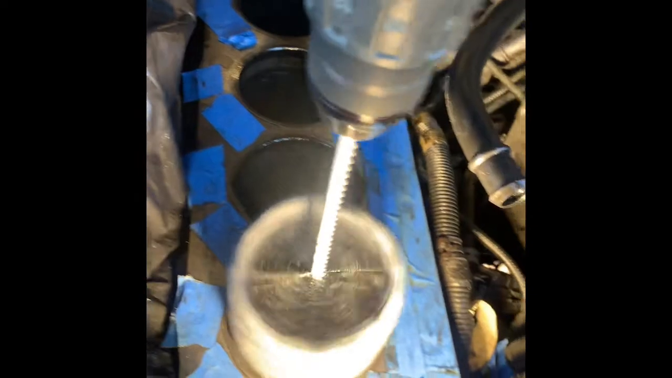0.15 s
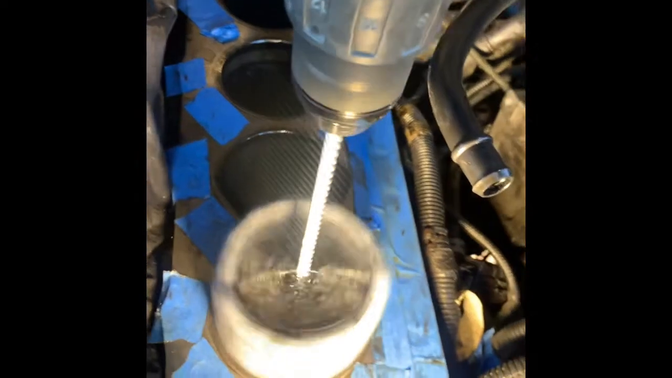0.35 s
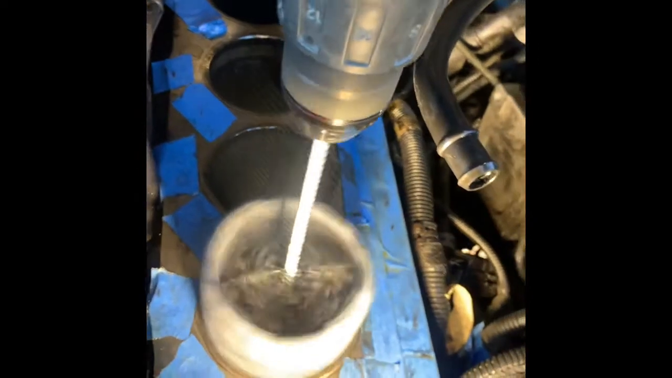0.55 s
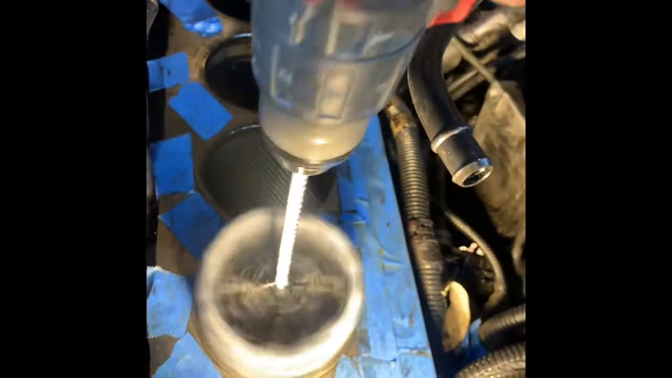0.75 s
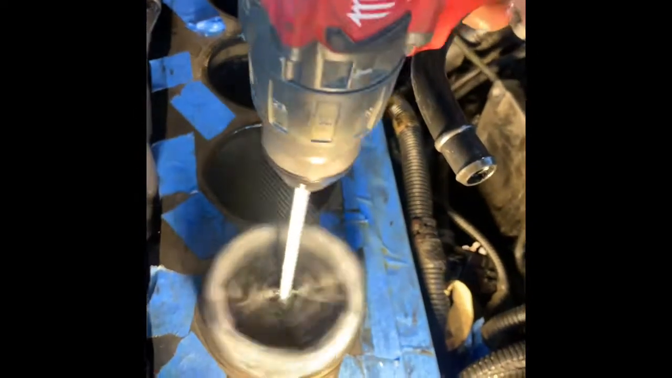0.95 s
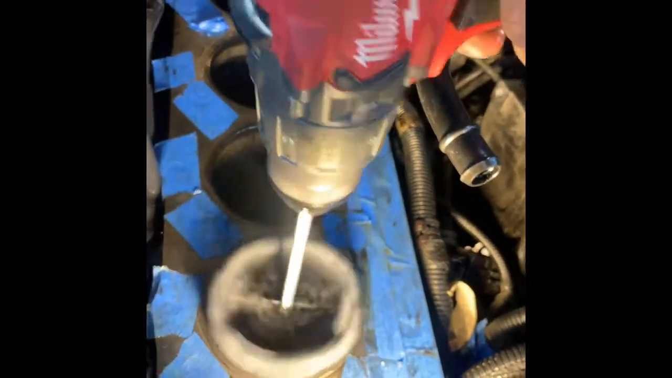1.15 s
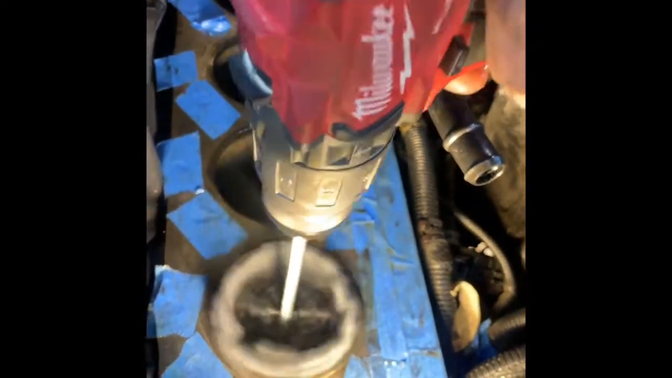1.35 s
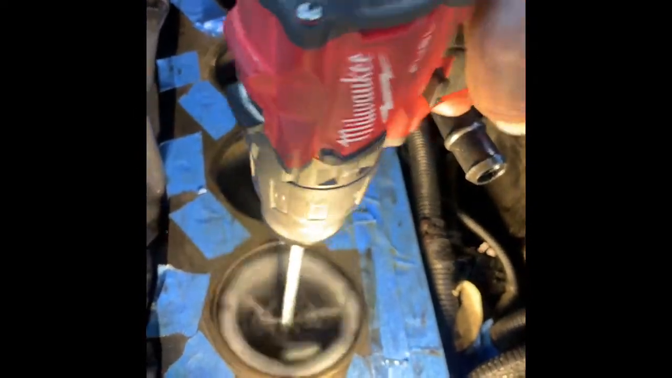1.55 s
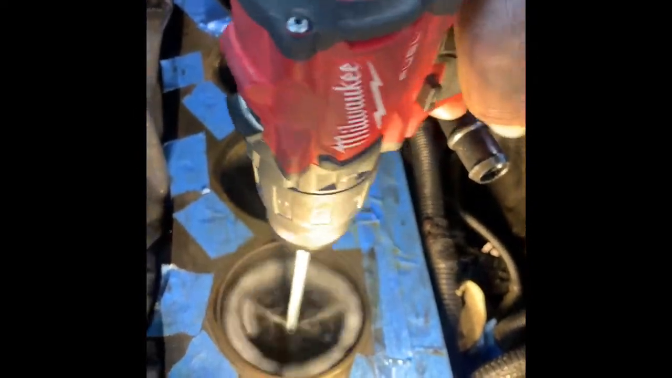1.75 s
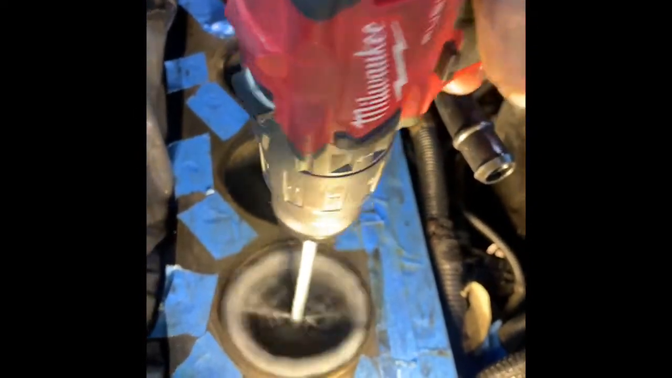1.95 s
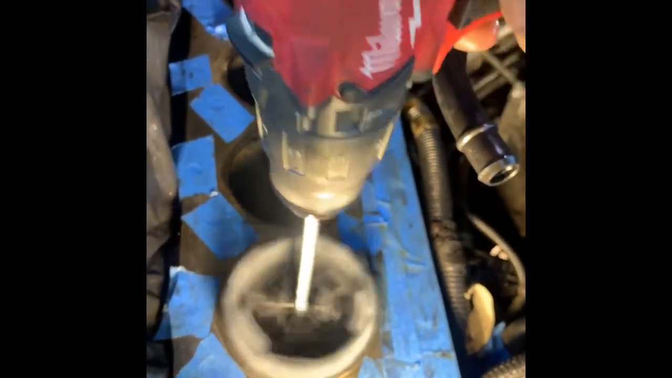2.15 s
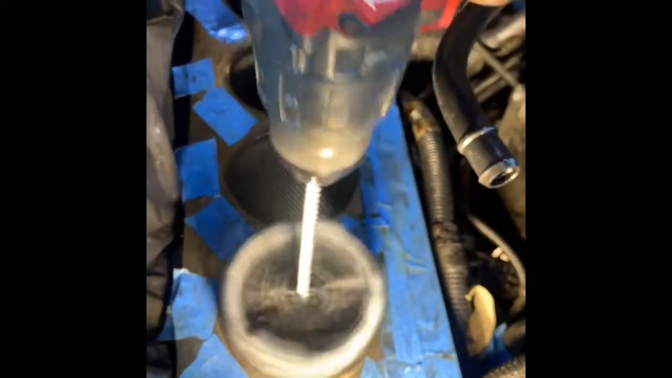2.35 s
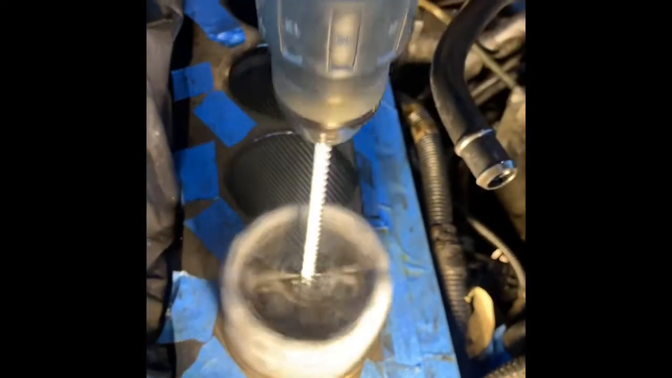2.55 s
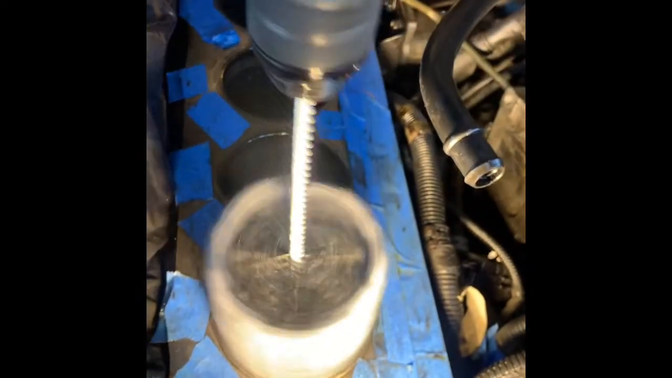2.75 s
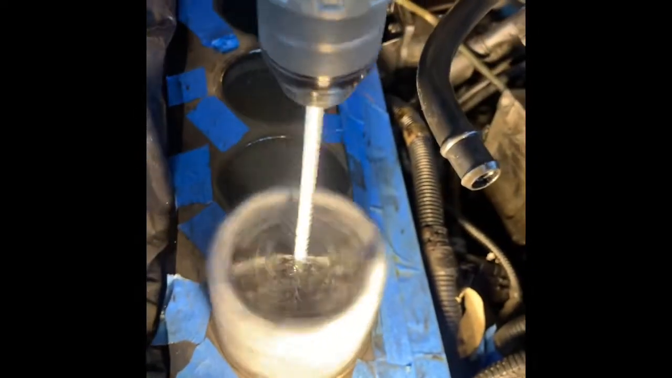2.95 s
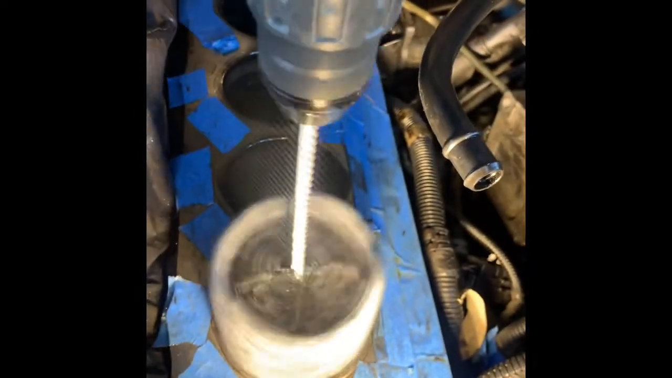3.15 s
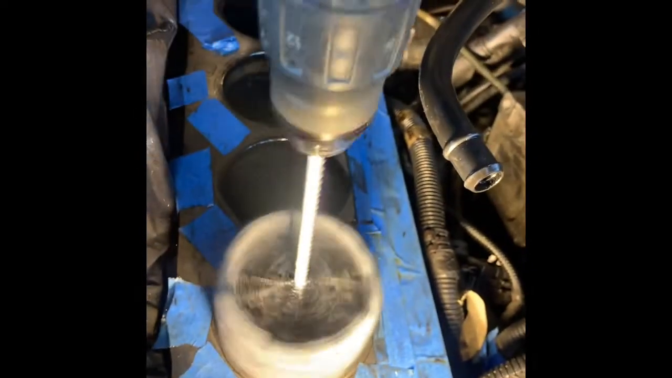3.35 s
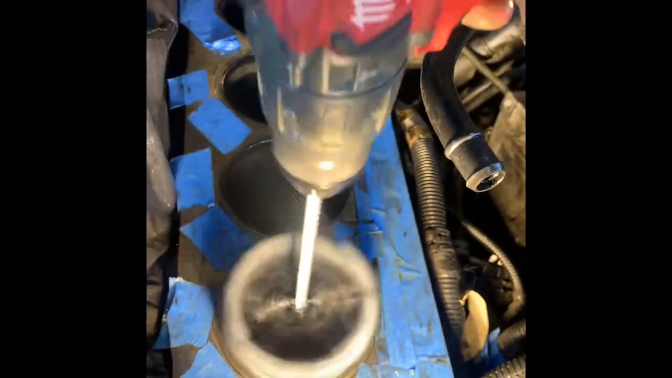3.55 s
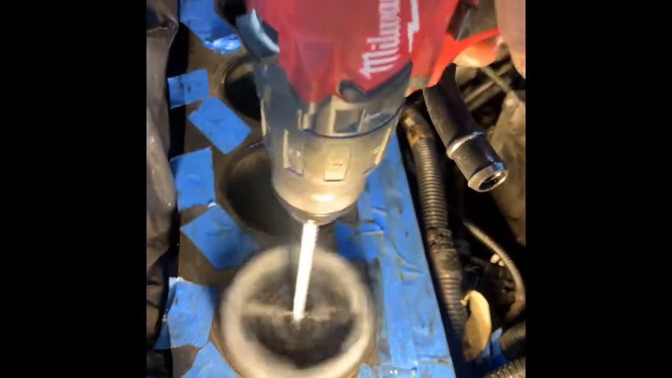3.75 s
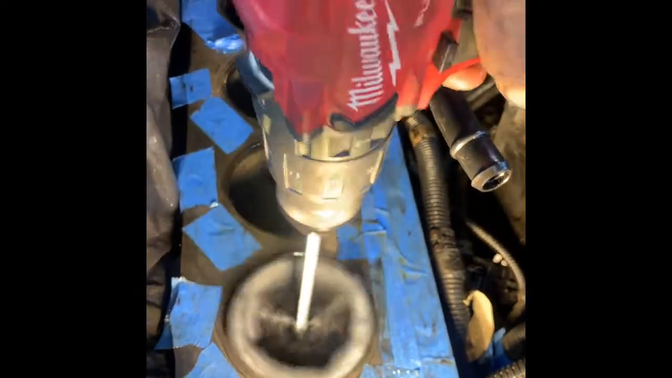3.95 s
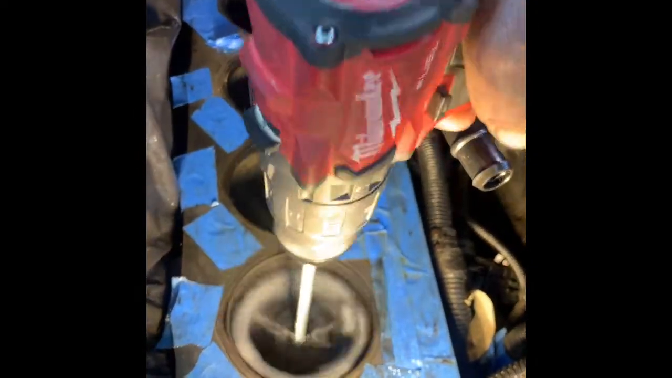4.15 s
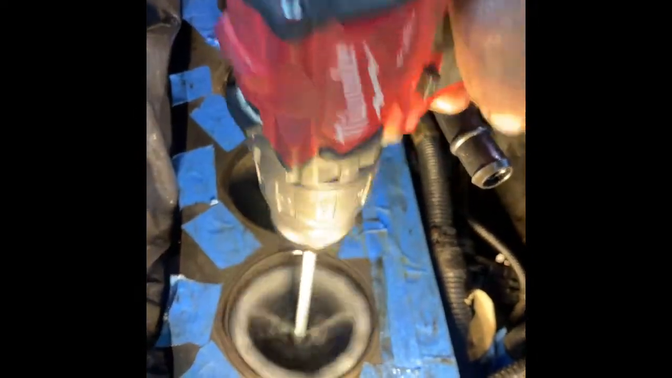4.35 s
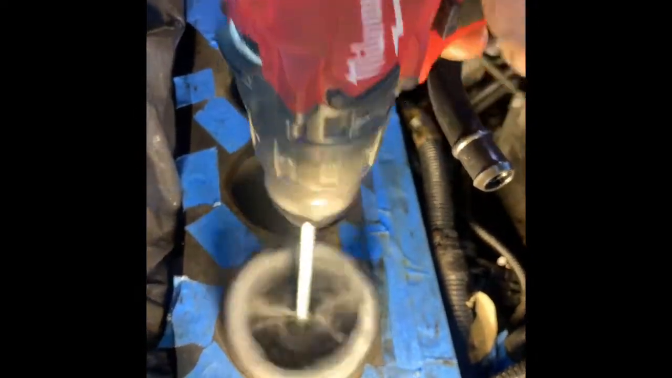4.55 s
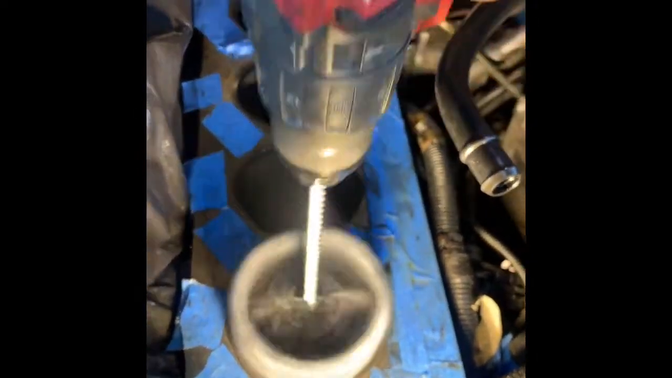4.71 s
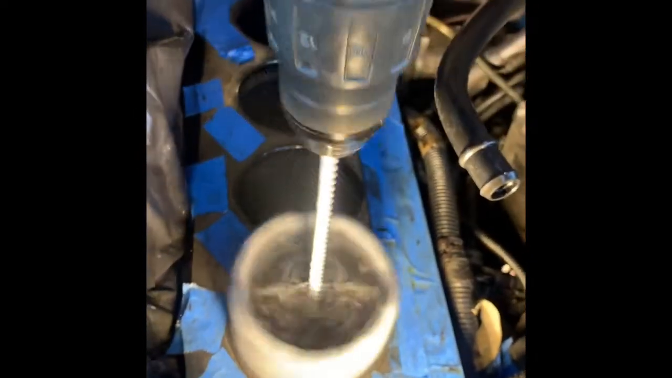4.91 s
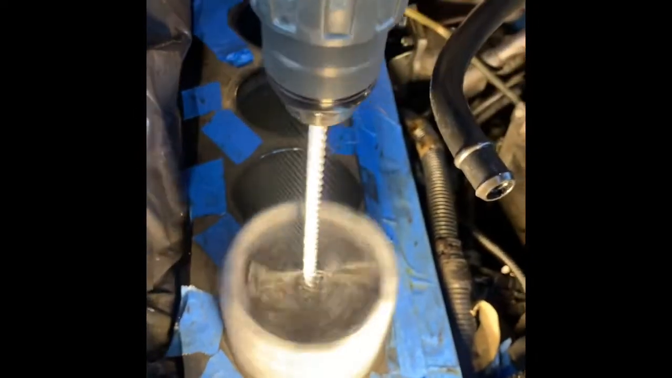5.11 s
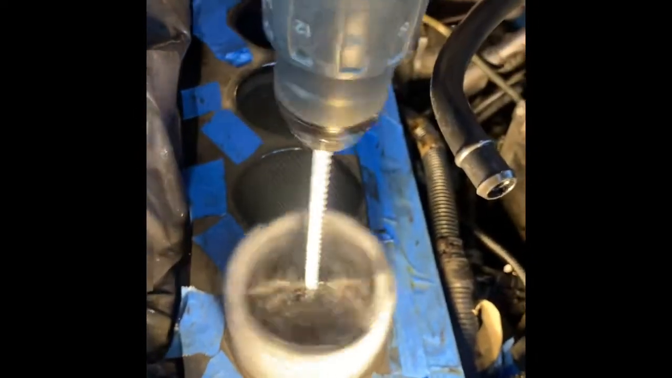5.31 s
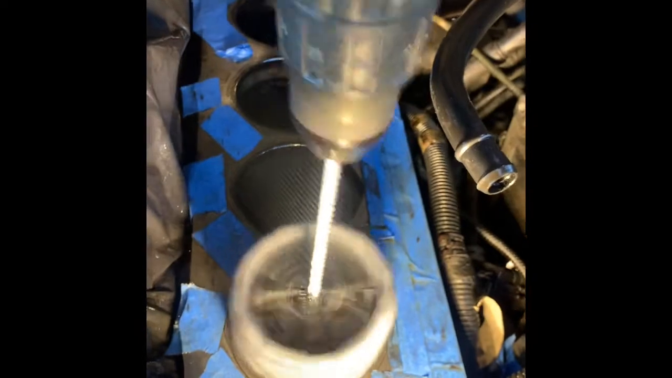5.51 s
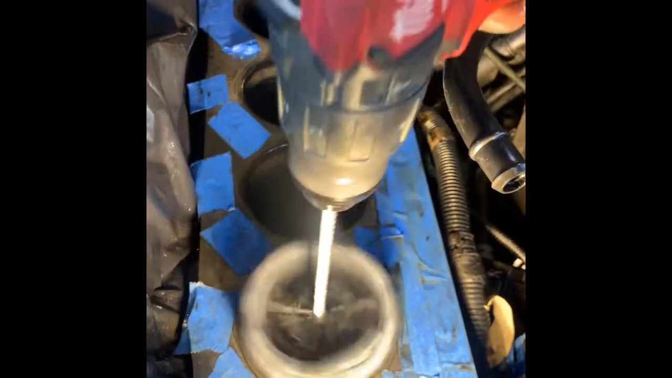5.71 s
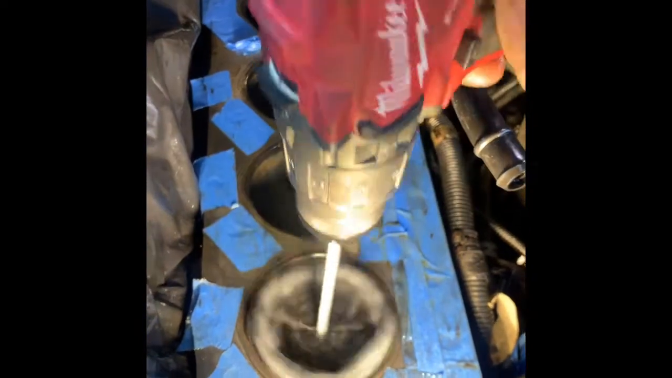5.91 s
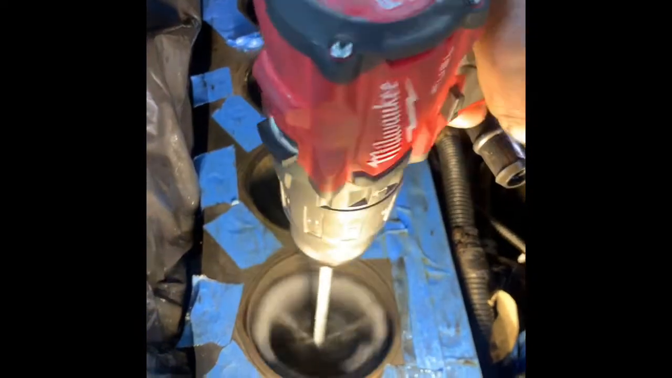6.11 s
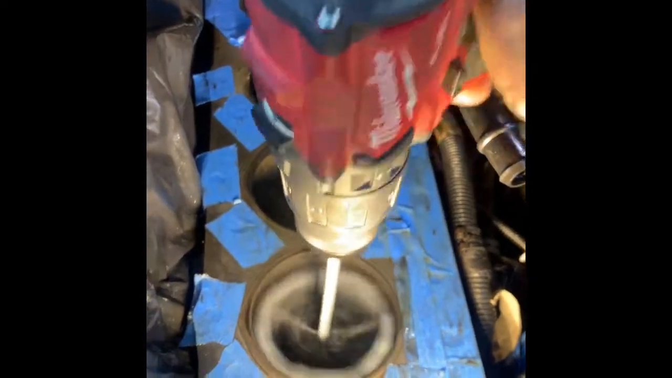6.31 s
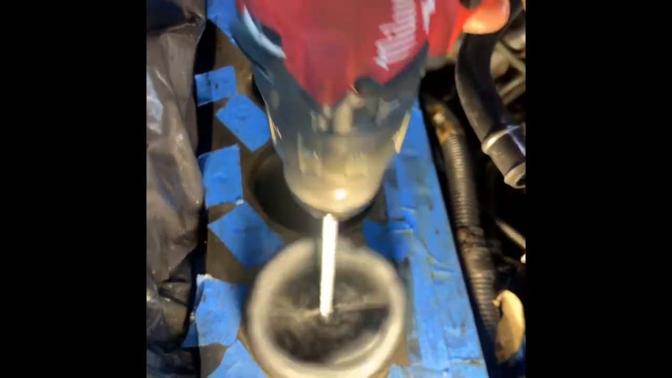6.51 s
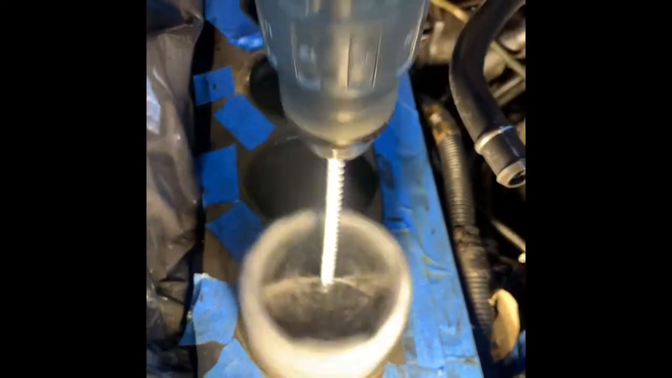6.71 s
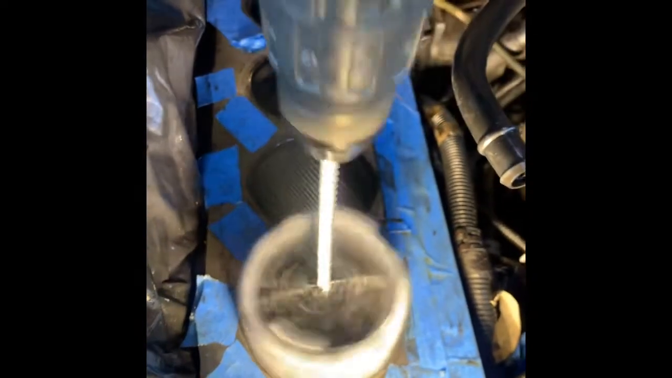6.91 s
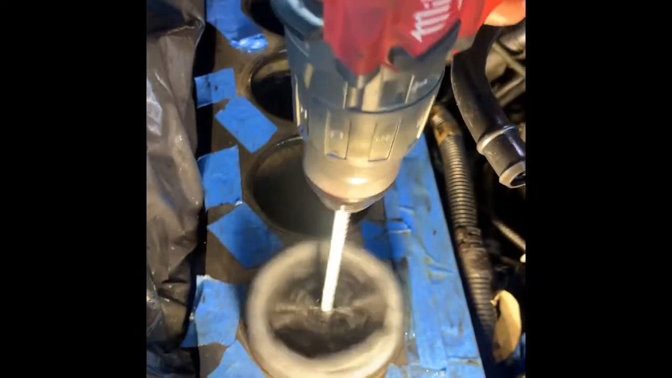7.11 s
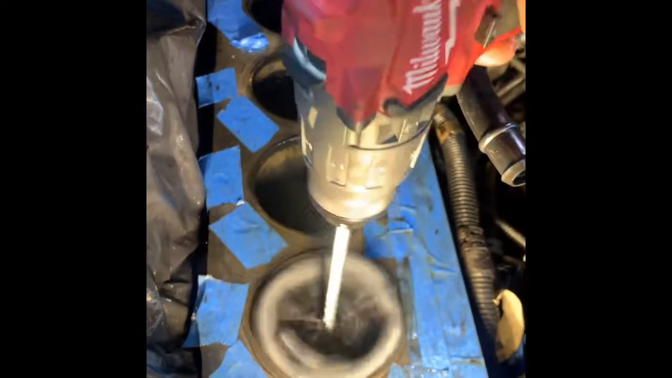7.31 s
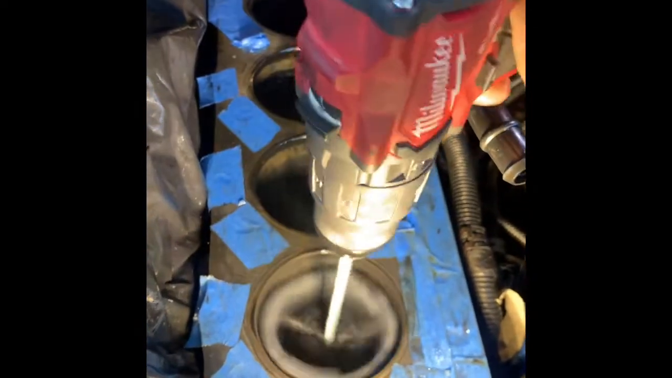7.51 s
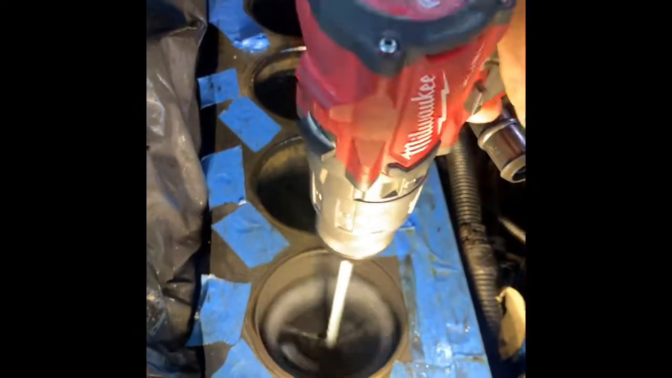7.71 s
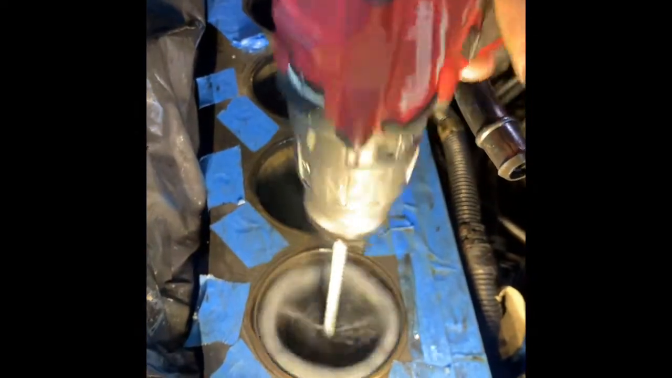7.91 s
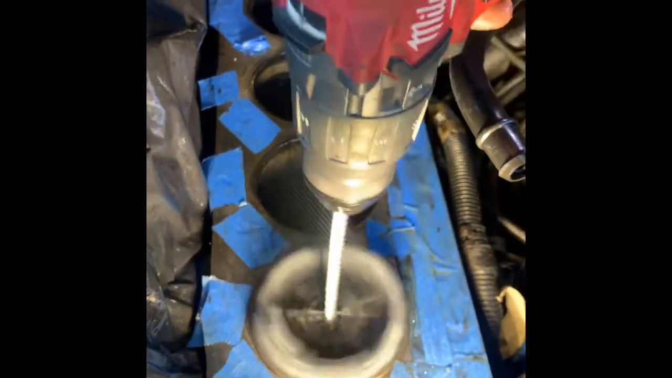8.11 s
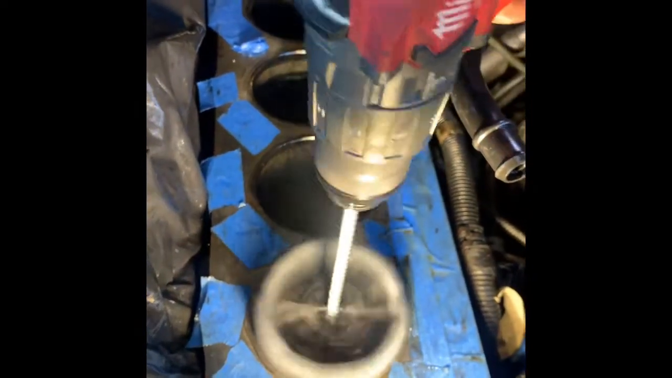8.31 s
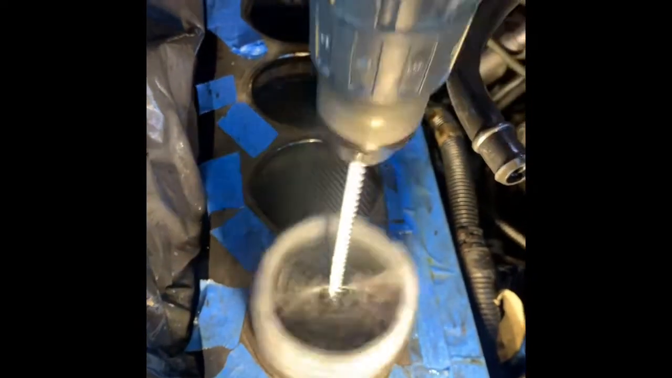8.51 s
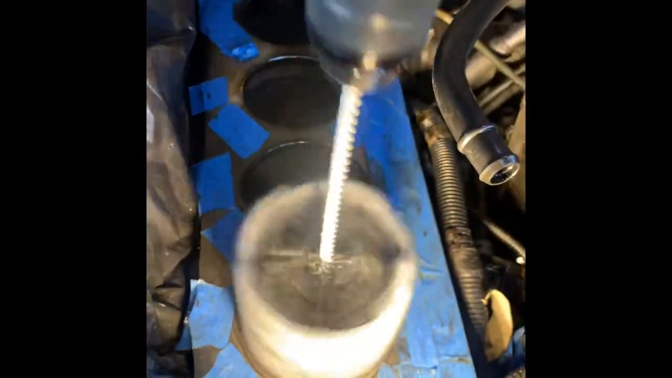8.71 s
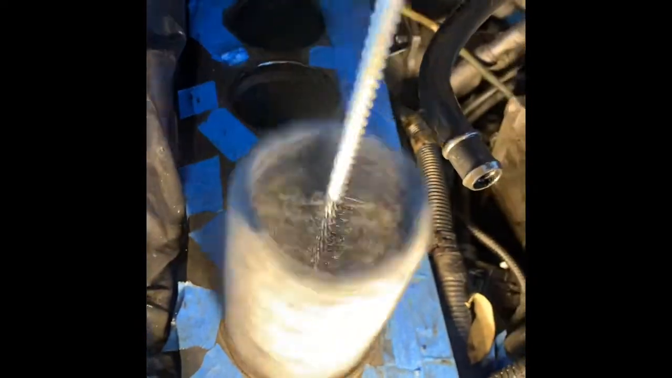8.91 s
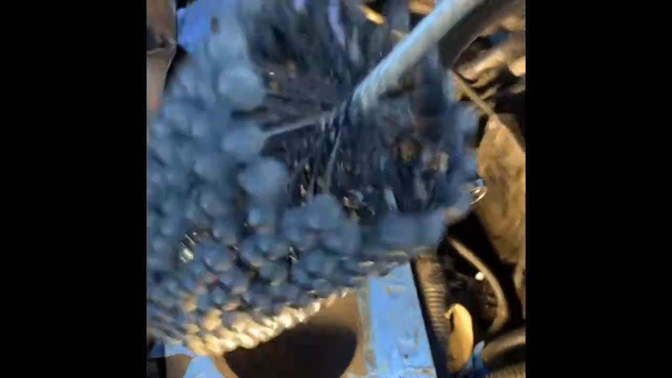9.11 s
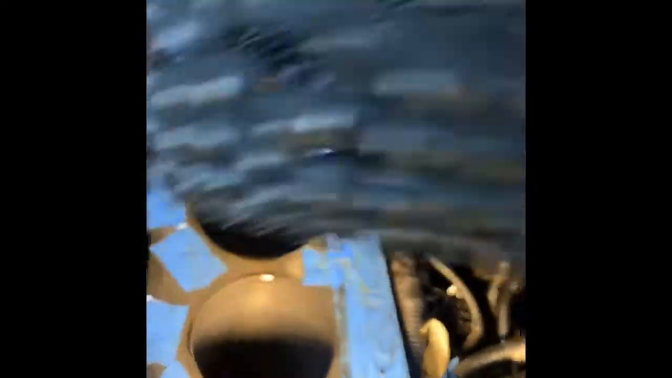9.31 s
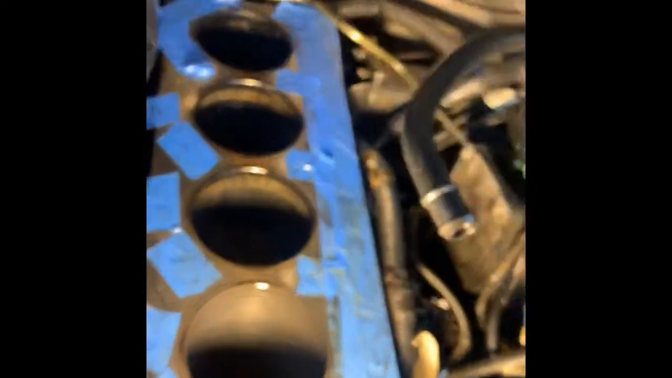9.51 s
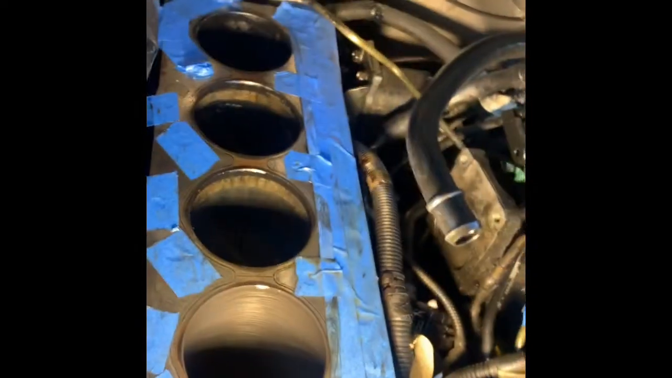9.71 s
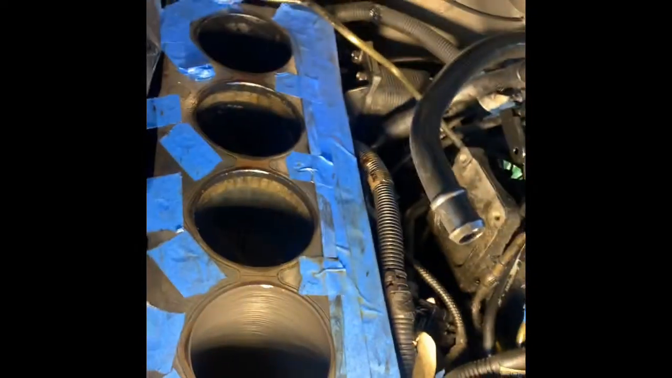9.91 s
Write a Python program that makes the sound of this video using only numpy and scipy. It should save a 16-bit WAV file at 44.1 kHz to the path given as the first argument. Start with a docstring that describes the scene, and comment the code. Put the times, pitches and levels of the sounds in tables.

```python
"""In a workshop, close by: a cordless drill strokes a ball hone up and down an engine cylinder.
Gears, motor and fan whine on the rotor's turning; random grains of grit excite the bore and gearbox.
Shaped noise gives air on the microphone's two ports, the room's quiet and its reflections.
Near 2.55 s the trigger is squeezed harder; the whine then swells in mid-stroke and drops when the load
slackens. Near 9 s the brake stops the chuck with ringing clacks and the hone's wires brush on the way out."""
import sys
import numpy as np
from scipy import signal
from scipy.fft import rfft, irfft
from scipy.io import wavfile

SR = 44100
rng = np.random.default_rng(int(sys.argv[2]) if len(sys.argv) > 2 else 0)


def master_out(mix):
    """Clip the mix to full scale and print it as 16-bit PCM to the path in sys.argv[1]."""
    frames = np.transpose(np.atleast_2d(mix))
    ceiling = np.clip(frames, -1, 1)
    pcm = np.round(ceiling * 32767).astype(np.int16)
    wavfile.write(sys.argv[1], SR, pcm)


N = 439236
TIME = np.arange(N) / SR
FREQ = np.maximum(np.arange(N // 2 + 1) * SR / N, 1)

# quiet of the workshop: pitch_hz, relative_level_db
FLOOR_SPECTRUM = [(15, -24.5), (45, 7), (100, 2.5), (200, -18), (400, -9.5), (700, -26.5), (1500, -19.5),
                  (1950, -14.5), (2400, -35), (3200, -21.5), (4000, -41), (15000, -58)]
# rumble of air on the microphone: pitch_hz, relative_level_db
RUMBLE_SPECTRUM = [(20, -42), (40, -11.5), (60, 2), (88, -0.5), (130, -9.5), (200, -21), (320, -26.5),
                   (600, -48.5), (2000, -81)]
# puffs of air hitting the microphone: centre_s, peak_level_db, half_length_s
GUSTS = [(.1, -56, .1), (.55, -62, .08), (2.39, -44.5, .055), (2.516, -35, 0.036), (2.628, -31.5, 0.042),
         (4.84, -44.5, .06), (4.983, -39, 0.044), (5.09, -43, .035), (5.26, -49, .03), (5.38, -49, .025),
         (5.718, -49, .06), (6.677, -37, 0.036), (6.79, -23, 0.038), (6.88, -37, 0.033),
         (7.622, -49.5, .03), (8.128, -40, .035), (8.297, -43, 0.13), (8.65, -39.5, .03),
         (8.742, -37, 0.056), (9.399, -53, 0.04), (9.902, -57, .05)]
# the vents' draught at the top of the bore, its gain at the bottom, and its flutter
DRAUGHT_DB, DRAUGHT_DEPTH_DB, DRAUGHT_FLUTTER_DB = -50.5, -28, 3.5
CALM_DB = -69.5  # air that stirs without the drill

# quick reflections in the engine bay, then the room
BAY_T60_S, BAY_DB = 0.071, -20.5
WORKSHOP_T60_S, WORKSHOP_DB = 0.53, -40

# phase between the two microphone ports: pitch_hz, left_lead_rad
PORT_PHASE = [(20, 0), (200, -.45), (1000, -.45), (1400, -.1), (2100, 1.1), (2450, 2.1), (2670, 3.4),
              (2850, 6), (3150, 7.8), (4000, 8), (4750, 9.4), (6500, 12.6), (9000, 15.7), (11000, 18.9),
              (13100, 22), (16000, 26)]
# level between the two microphone ports: pitch_hz, left_minus_right_db
PORT_BALANCE = [(100, -3.5), (400, -1), (700, -5), (1400, -3.5), (1900, -10), (2100, -7), (2300, -1.5),
                (2750, 9.5), (3000, -8.5), (3180, 3.5), (3400, 0.5), (16000, -1.5)]
CUTOFF_HZ = 15850

# soft thumps of handling, falling in pitch: start_s, level_db, starting_pitch_hz
BUMPS = [(2.486, -39, 200), (2.606, -26.5, 200), (4.387, -38, 180), (4.441, -34, 353), (4.587, -36.5, 310),
         (4.709, -38, 298), (4.812, -41, 260), (4.943, -33, 170), (6.752, -26, 220), (7.99, -43, 300),
         (8.014, -39, 292), (8.085, -36, 210.2), (8.172, -34.5, 197), (8.267, -38.5, 160),
         (8.352, -35.5, 240), (8.512, -36.5, 290), (8.625, -34, 190), (8.691, -34.5, 191),
         (9.384, -49.5, 386), (9.555, -56.5, 150.5), (9.802, -48.5, 396), (9.889, -46, 380)]
BUMP_RISE_S, BUMP_GLIDE_S, BUMP_NOISE_DB = .007, .035, -6.5

# single flicks of the hone's wires against the bore: start_s, level_db
TICKS = [(9.0008, -40), (9.088, -60), (9.1028, -43.5), (9.157, -57), (9.2185, -47.5), (9.355, -54),
         (9.531, -62)]
TICK_RISE_S = .0022
# wires brushing as the hone is lifted: time_s, level_db
LIFT = [(8.94, -92), (8.97, -67), (9.06, -74), (9.14, -63), (9.3, -66), (9.45, -73.5), (9.6, -80),
        (9.96, -93)]
# colour of the wires: pitch_hz, relative_level_db
WIRE_SPECTRUM = [(200, -24), (450, -11.5), (700, -11.5), (1100, 0), (1800, 5), (2500, 1.5), (3500, 2),
                 (5000, -8.5), (7000, -11.5), (9000, -21), (15500, -28)]

# the chuck hammering against its lock: start_s, strike_level_db
CLACKS = [(8.9375, -29.5), (8.9408, -25), (8.9455, -24), (8.9482, -10.5), (8.9534, -12.5), (8.9569, -10.5),
          (8.9665, -30)]
# the drill's body and shaft: pitch_hz, relative_level_db, t60_s
DRILL_MODES = [(540, -27, 0.037), (800, -18, 0.06), (1325, -8, 0.04), (1640, -10, 0.035), (1920, -10, 0.04),
               (3010, -4, 0.03), (3280, -9, 0.03), (3790, 0, 0.048), (4020, -2, .025), (4540, -17, .04),
               (6200, -20, 0.04)]
# colour of the crack of a knock: pitch_hz, relative_level_db
CRACK_SPECTRUM = [(400, -11), (1400, 0), (2400, -3), (3100, 6.5), (3950, 7), (4700, -8), (7000, -10.5),
                  (8800, -16.5), (11000, -12), (15500, -15)]

# how far the hone is down the bore: time_s, depth_0_to_1
DEPTH = [(0, 0.27), (.5, 0.3), (1.5, 0.87), (2.0, 0.83), (2.75, 0.21), (3.05, 0.15), (3.5, 0.56),
         (4.25, 0.97), (4.55, 0.69), (5.05, 0.36), (5.45, 0.32), (5.68, 0.63), (6.2, 1), (6.5, 0.69),
         (6.8, 0.48), (7.75, 0.94), (8.05, 0.74), (8.4, 0.45), (8.8, 0.22)]
# spells when the load slackens: start_s, fall_s, hold_s, recovery_s, ringing_share_0_to_1, whine_share_0_to_1
SLACKS = [(5.507, 0.073, 0.017, .02, 0.4, 0.02), (6.871, 0.021, 0.099, .28, 0.6, 1),
          (8.321, .06, 0.44, 0.27, 0.72, 0.48)]
GEAR_SLACK_DB, HUM_SLACK_DB = -16, -5.5

# motor under a light trigger: time_s, speed_turns_per_s
LIGHT_SPEED = [(0.0, 356.3), (0.2, 349.8), (0.45, 348.8), (0.56, 347.1), (0.64, 342.3), (0.8, 337.2),
               (0.94, 334.0), (1.37, 334.7), (1.66, 333.7), (1.7, 329.0), (1.82, 329.7), (1.9, 326.5),
               (2.25, 330.2), (2.3, 334.3), (2.5, 334.1), (2.54, 331.4)]
# motor under a full trigger, dragged down by the hone: time_s, speed_turns_per_s
FULL_SPEED = [(2.7, 414.9), (2.85, 418.6), (3.03, 418.3), (3.59, 399.3), (4.28, 398.3), (4.5, 395.8),
              (4.64, 398), (4.7, 403.3), (4.84, 407), (4.96, 412.5), (5.18, 416.7), (5.4, 410.5),
              (5.8, 398.8), (6.56, 395.5), (6.77, 409), (6.88, 411.5), (7.04, 401.8), (7.27, 396.8),
              (7.99, 395.8), (8.06, 399.7), (8.53, 402.5), (8.67, 410.8), (8.71, 415.9), (8.88, 425.1)]
# the hone snags and the motor dips: centre_s, lost_turns_per_s
SNAGS = [(4.768, 10.8), (4.892, 11.5), (5.025, 11.4), (5.41, 3), (7.713, 3.05), (8.12, 4.5), (8.24, 2.76),
         (8.391, 3.6)]
SNAG_S = .038  # half length of a dip
# the drive cuts out for an instant: centre_s, half_length_s, lost_turns_per_s, lost_gear_db, lost_fan_db
STUMBLE = (4.326, 0.0352, 9.18, 11.5, 24.6)
SQUEEZE_S, SPIN_UP_S = 2.551, .029  # the trigger goes from light to full
BRAKE_S, BRAKE_TURNS_PER_S2, STOP_S = 8.903, 3700, 8.945
WORKING_SPEED = 400  # turns per s at which the level laws have no speed term

# hum of the rotor before slackening: speed_turns_per_s, level_db
HUM = [(260, -71), (325, -52), (397, -49), (418, -44)]
# fan whistle, swelling and fading as the drill moves, before its flutter: time_s, level_db
FAN = [(0, -37.5), (2.5, -41.5), (2.7, -37.5), (3.3, -39.5), (3.47, -36.5), (3.9, -39), (4.08, -37.5),
       (4.27, -36), (4.48, -37), (4.6, -37.5), (4.7, -39), (5.1, -40.5), (5.48, -42), (5.65, -37.5),
       (6.0, -36), (6.17, -47), (6.33, -34), (6.55, -39.5), (6.85, -42), (7.0, -38), (7.2, -40.5),
       (7.45, -41), (7.65, -44.5), (7.93, -36.5), (8.1, -45), (8.25, -45.5), (8.42, -36), (8.55, -42.5),
       (8.9, -40)]
# the fan's octave, coming out at high speed: speed_turns_per_s, level_re_hiss_law_db
FAN_OCTAVE = [(340, -22.5), (400, -16.5), (416, -10.5), (424, -16)]
# weaker motor and gear tones: multiple_of_rotor_speed (rounded to 1/14 when played),
# light_trigger_re_bore_law_db, full_trigger_re_bore_law_db
ORDERS = [(2, -29, -16.5), (4.01, -12.5, -11), (4.994, -21, -18), (9.32, -21.5, -30), (10, -24, -28),
          (10.2, -22, -14.5), (12, -11.5, -24.5), (15.94, -29.5, -29)]
# how well the housing radiates the weaker tones: pitch_hz, gain_db
HOUSING = [(800, -1.5), (2700, 3.5), (3350, 15.5), (4050, -3), (4700, -20.5), (6600, 2)]
GEAR_TEETH, FAN_BLADES = 8, 13

# gear mesh under a light trigger: time_s, level_db
LIGHT_GEAR = [(0, -20.5), (.35, -25), (.52, -22), (.62, -20.5), (.85, -23.5), (1.1, -25.5), (1.45, -30),
              (1.65, -34), (1.72, -40), (1.8, -35.5), (1.92, -36.5), (2.1, -29.5), (2.26, -27.5),
              (2.31, -24), (2.5, -22.5), (2.54, -32)]
# gear mesh under a full trigger, loudest in mid-stroke: depth_0_to_1, level_db
FULL_GEAR = [(.15, -28), (.33, -25.5), (.45, -21.5), (.62, -19.5), (.8, -22), (1, -28.5)]
# gear beam sweeping across the ports as the drill moves: time_s, left_minus_right_db, left_lead_rad
GEAR_BEAM = [(0, -4, 6.3), (.2, 0, 5.8), (.42, 5, 5.6), (.52, 15.5, 4), (.6, 14, 4), (.7, 5.5, 3.2),
             (.8, 1, 3.14), (.98, -2, 3.05), (1.1, 0, 3.12), (2.21, -2, 3.14), (2.27, -2.5, 3),
             (2.32, 1, 3.27), (2.42, -2, 3.32), (2.54, 1.5, 3.8), (2.565, 1, 7.77), (4.3, 3, 7.85),
             (8.9, 1, 7.84)]
SURGE_DB, SURGE_RISE_S, SURGE_S = 14.5, 0.0052, 0.078  # the gears strain as the motor spins up
# the gears take up the braking load: centre_s, half_length_s, gain_db
BRAKE_STRAIN = (8.92, .006, 10)
BRAKE_FADE_DB_PER_S = 257.5  # the unloaded gears fall quiet

# level laws of the rubbing, before each layer's trim in honing():
# top_of_bore_db, gained_at_bottom_db, db_per_db_of_speed, gained_when_slack_db
SCRAPE_LAW = (-34, -2.5, 2, -4.5)
BORE_LAW = (-34, 5, 1.55, -19)
GEARBOX_LAW = (-38, -4, 0.86, -24.5)
HISS_LAW = (-42.5, -1.5, 1.06, -2.5)
# walls of the cylinder: pitch_hz, width_hz, relative_level_db
CYLINDER = [(378, 290, -13), (706, 220, -6), (1247, 350, 0), (1443, 300, -0.5)]
# resonances of the gearbox: pitch_hz, width_hz, relative_level_db
GEARBOX = [(2865, 230, -12), (3197, 390, 7), (3730, 570, -2.5)]
# sliding ring of the bore: top_pitch_hz, gained_per_unit_reach_hz, width_hz
BORE = (1890, 70, 262)
# sliding resonance of the air column: top_pitch_hz, gained_per_unit_reach_hz, width_hz
AIR_COLUMN = (790, 100, 230)
SLIDE_PER_SPEED = 3.5  # faster spin raises both: reach added when the working speed doubles
# hiss of the grit: pitch_hz, relative_level_db
HISS_SPECTRUM = [(200, -20.5), (500, -4.5), (2400, 8), (4600, 3), (5600, -5.5), (6550, 2.5), (7400, -1.5),
                 (9000, -10.5), (12500, -8), (15500, -9.5)]
# bands of the scraping cancelled by an echo off the engine's deck: pitch_hz, width_hz, share_0_to_1
NOTCHES = [(1060, 79, 0.7), (2407, 300, 0.48)]


def from_db(db):
    """Decibels to gain."""
    return 10 ** (np.asarray(db) / 20)


def rms_one(x):
    """Scale to unit power."""
    return x / np.sqrt(np.mean(x ** 2) + 1e-20)


def in_time(rows):
    """Each column of a curve at every sample."""
    s, *columns = np.transpose(rows)
    return [np.interp(TIME, s, column) for column in columns]


def at_hz(points):
    """A table read at every frequency, on a log axis."""
    hz, value = np.transpose(points)
    return np.interp(np.log(FREQ), np.log(hz), value)


def colour(x, spectrum):
    """Give a signal a spectrum; rms 1."""
    return rms_one(irfft(rfft(x) * from_db(at_hz(spectrum)), N))


def drift(rate):
    """Random wander, linear between unit-spread knots drawn at twice the rate in Hz."""
    knots = rng.standard_normal(2000)
    return np.interp(TIME * 2 * rate, np.arange(len(knots)), knots)


def low_pass(x, hz):
    """Second-order low-pass."""
    sections = signal.butter(2, min(hz, SR * .45), fs=SR, output="sos")
    return signal.sosfilt(sections, x + 1e-18)


def high_pass(x, hz):
    """Second-order high-pass."""
    return signal.sosfilt(signal.butter(2, hz, "high", fs=SR, output="sos"), x)


def hump(s, half_s):
    """A brief rise to 1 and back, centred on s."""
    return (1 + ((TIME - s) / half_s) ** 2) ** -2


def swell(start_s, rise_s):
    """An envelope that rises to 1 and dies away."""
    age = np.maximum(TIME - start_s, 0) / rise_s
    return age * np.exp(1 - age)


def bursts(events, decay_s):
    """An envelope that jumps at each event and dies away."""
    jumps = np.zeros(N)
    for s, db in events:
        jumps[round(s * SR)] = from_db(db)
    return signal.lfilter([1], [1, -np.exp(-1 / (decay_s * SR))], jumps + 1e-18)


def workshop_floor():
    """Quiet of the place: coloured noise, partly shared by the two channels."""
    noise = rng.standard_normal(N) + .6 * rng.standard_normal((2, N))
    return from_db(-65) * colour(noise, FLOOR_SPECTRUM)


def buffeting(depth, running):
    """Turbulence on the two ports, nearly alike: a draught stronger when the drill is raised, and puffs."""
    draught = running * from_db(DRAUGHT_DB + DRAUGHT_DEPTH_DB * depth) + from_db(CALM_DB)
    puffs = sum(from_db(db) * hump(s, half_s) for s, db, half_s in GUSTS)
    turbulence = rng.standard_normal(N) + .4 * rng.standard_normal((2, N))
    flutter = from_db(DRAUGHT_FLUTTER_DB * drift(7.8))
    return np.hypot(draught * flutter, puffs) * colour(turbulence, RUMBLE_SPECTRUM)


def reflections(x, t60_s):
    """A diffuse, dull decaying tail, unrelated in the two channels."""
    age = TIME[:SR]
    late = age > .006
    tail = low_pass(rng.standard_normal((2, SR)), 3800) * from_db(-60 * age / t60_s) * late
    return signal.fftconvolve(x[None], rms_one(tail) / np.sqrt(SR), axes=1)[:, :N]


def engine_bay(x, depth):
    """Quick reflections that crossfade between five patterns as the drill moves up and down."""
    places = np.linspace(0, 1, 5)
    near = np.maximum(1 - np.abs(depth - places[:, None]) / places[1], 0)
    return sum(reflections(x * np.sqrt(share), BAY_T60_S) for share in near)


def ports(x):
    """The two microphone ports hear the near sound with their own phase and level at each pitch."""
    tilt = from_db(at_hz(PORT_BALANCE))
    delay = np.exp(-1j * at_hz(PORT_PHASE))
    response = np.array([tilt, delay]) * np.sqrt(2 / (1 + tilt ** 2))
    taps = np.roll(irfft(response, N), 512, axis=1)[:, :1025] * np.hanning(1025)
    return np.array([signal.fftconvolve(x, port, "same") for port in taps])


def bumps():
    """Dull, padded handling thumps: a burst of rumble with a sinking tone in it."""
    age, out = TIME[:SR // 10], np.zeros(N + SR)
    envelope = swell(0, BUMP_RISE_S)[:len(age)]
    for s, db, hz in BUMPS:
        tone = np.sin(2 * np.pi * hz * BUMP_GLIDE_S * (1 - np.exp(-age / BUMP_GLIDE_S)))
        dull = low_pass(low_pass(rng.standard_normal(len(age)), hz), hz)
        rumble = from_db(BUMP_NOISE_DB) * rms_one(dull)
        out[round(s * SR):][:len(age)] += from_db(db) * (0.51 * tone + rumble) * envelope
    return out[:N]


def grains(per_s, spread_db, count):
    """Independent trains of tiny contacts of uneven size."""
    born = rng.random((count, N)) < per_s / SR
    size_db = spread_db * np.minimum(rng.exponential(1, born.sum()), 4)
    clicks = np.zeros((count, N))
    clicks[born] = rng.choice([-1, 1], born.sum()) * from_db(size_db)
    return rms_one(clicks)


def wires():
    """Sprung wires flick and brush on the way out of the bore; the harder a flick, the brighter it is."""
    (lift_db,) = in_time(LIFT)
    flicks = sum(from_db(db) * swell(s, TICK_RISE_S) for s, db in TICKS)
    hardness = flicks / flicks.max()
    bright, dull = (colour(train, WIRE_SPECTRUM) for train in grains(4000, 2.6, count=2))
    dull = low_pass(dull, 5200)
    flicking = flicks * (np.sqrt(hardness) * bright + np.sqrt(1 - hardness) * dull)
    brushing = from_db(lift_db + 1.8 * drift(30)) * dull
    return flicking + brushing


def clacks():
    """Each knock is a short crack that also sets the drill's modes ringing."""
    at = [round(s * SR) for s, db in CLACKS]
    strike_db, ringing = np.array(CLACKS)[:, 1], np.zeros(N)
    for hz, db, t60 in DRILL_MODES:
        clicks = np.zeros(N)
        uneven_db = strike_db + db - 11 + rng.normal(0, 1.6, len(at))
        clicks[at] = from_db(uneven_db) * rng.choice([-1, 1], len(at))
        r, w = from_db(-60 / (t60 * SR)), 2 * np.pi * hz / SR
        ringing += signal.lfilter([0, np.sin(w)], [1, -2 * r * np.cos(w), r * r], clicks + 1e-18)
    crack = from_db(-1.5) * bursts(CLACKS, .0016) * colour(rng.choice([-1, 1], N), CRACK_SPECTRUM)
    # the jolt shakes the hone
    shiver = from_db(-23.5) * bursts(CLACKS, 0.0082) * colour(rng.standard_normal(N), WIRE_SPECTRUM)
    return high_pass(ringing + crack + shiver, 330)  # too small a body to radiate bass


def slackening():
    """How far the load is off the ringing and off the whine, 0-1: each spell falls, holds and recovers."""
    out = np.zeros((2, N))
    for s, fall_s, hold_s, recovery_s, *shares in SLACKS:
        recovered_s = np.maximum(TIME - s - fall_s - hold_s, 0)
        spell = np.clip((TIME - s) / fall_s, 0, 1) * np.exp(-recovered_s / recovery_s)
        out = np.maximum(out, np.outer(shares, spell))
    return out


def motor_speed(trigger):
    """Turns per second: the trigger sets them, snags steal a few, the brake takes them down to 1."""
    (light,), (full,) = in_time(LIGHT_SPEED), in_time(FULL_SPEED)
    snagging = sum(lost * hump(s, SNAG_S) for s, lost in SNAGS)
    braking = BRAKE_TURNS_PER_S2 * np.maximum(TIME - BRAKE_S, 0)
    return np.maximum(light + trigger * (full - light) - snagging - braking, 1)


def law_level(law, depth, speed, slack):
    """Level in dB of a sound that follows the hone's depth, speed and load."""
    top_db, depth_db, per_speed, slack_db = law
    speed_db = 20 * np.log10(speed / WORKING_SPEED)
    return top_db + depth_db * depth + per_speed * speed_db + slack_db * slack


def fan_and_motor(angle, speed, trigger, fan_db, hum_db, bore_db, hiss_db):
    """Fan whistle, rotor hum and weaker motor and gear tones, all locked to the rotor's angle."""
    blades = FAN_BLADES * angle
    octave_db = hiss_db + np.interp(speed, *np.transpose(FAN_OCTAVE))
    fan = from_db(fan_db + 1.86 * drift(30)) * np.sin(blades)
    fan += from_db(octave_db + 2.5 * drift(5.0)) * np.sin(2 * blades)
    motor = from_db(hum_db) * np.sin(angle)
    for order, light_db, full_db in ORDERS:
        order_db = light_db + trigger * (full_db - light_db)
        radiated_db = np.interp(order * speed, *np.transpose(HOUSING))
        level = from_db(bore_db + order_db + radiated_db + 1.8 * drift(6))
        motor += level * np.sin(np.round(order * 14) / 14 * angle)
    return np.sqrt(2) * (fan + motor)


def gear_level(trigger, depth, slack):
    """The mesh tone in dB: follows the stroke, surges on spin-up and braking, returns late after slack."""
    (light_db,) = in_time(LIGHT_GEAR)
    full_db = np.interp(depth, *np.transpose(FULL_GEAR))
    age = np.maximum(TIME - SQUEEZE_S, 0)
    surge_db = SURGE_DB * (1 - np.exp(-age / SURGE_RISE_S)) * np.exp(-age / SURGE_S)
    strain_s, half_s, strain_db = BRAKE_STRAIN
    surge_db = surge_db + strain_db * hump(strain_s, half_s)
    return light_db + trigger * (full_db - light_db) + surge_db + GEAR_SLACK_DB * np.sqrt(slack)


def gear_whine(angle, speed, gear_db):
    """The mesh tone at the two ports; play in the gears roughens it more at full speed."""
    play_db = np.interp(speed, [350, 395], [.5, 1.1]) * (drift(25) + drift(110))
    level = from_db(gear_db + play_db + 0.77 * drift(6.5))
    mesh = GEAR_TEETH * angle + 0.084 * drift(70)
    balance_db, lead = in_time(GEAR_BEAM)
    tilt = from_db(balance_db)
    return 2 * level / np.sqrt(1 + tilt ** 2) * np.array([tilt * np.sin(mesh), np.sin(mesh - lead)])


def resonate(x, peaks):
    """Parallel resonances, each passed twice for deep valleys; rms 1."""
    out = 0
    for train, (hz, width, db) in zip(x, peaks):
        r = np.exp(-np.pi * width / SR)
        b = (1 - r * r) / 2 * np.array([1, 0, -1])
        a = [1, -2 * r * np.cos(2 * np.pi * hz / SR), r * r]
        out = out + from_db(db) * signal.lfilter(b, a, signal.lfilter(b, a, train))
    return rms_one(out)


def sliding(resonance, reach):
    """Grit excites a resonance whose centre moves with reach (depth plus a speed term); rms 1."""
    top_hz, reach_hz, width_hz = resonance
    slow = low_pass(grains(2400, 2.85, count=2), width_hz / 2)
    turn = 2 * np.pi * np.cumsum(top_hz + reach_hz * reach) / SR
    return rms_one(slow[0] * np.cos(turn) + slow[1] * np.sin(turn))


def notched(x):
    """Cut the bands that the deck's echo cancels."""
    for hz, width_hz, share in NOTCHES:
        cut = signal.lfilter(*signal.iirnotch(hz, hz / width_hz, fs=SR), x)
        x = x + np.clip(share, 0, 1) * (cut - x)
    return x


def honing(angle, speed, depth, scrape_db, bore_db, gearbox_db, hiss_db):
    """Abrasive balls scratch the wall and excite cylinder and drill; the rub wavers slightly, irregularly."""
    press = from_db(0.11 * np.sin(angle / 56) + 0.88 * drift(35))  # mostly random wavering
    chatter = 1 + 0.32 * np.sin(angle) + 0.055 * np.sin(angle / 2)  # the rotor shakes the contacts
    reach = depth + SLIDE_PER_SPEED * (speed / WORKING_SPEED - 1)
    wall_grit = grains(2800, 3.2, count=len(CYLINDER))
    wall = from_db(scrape_db - 1.0 - 1.3 * depth) * resonate(wall_grit, CYLINDER)
    hollow = from_db(scrape_db - 7.0 + 6.9 * depth) * sliding(AIR_COLUMN, reach)
    bore = from_db(bore_db - 2.0) * sliding(BORE, reach)
    gearbox_grit = grains(5000, 2.8, count=len(GEARBOX)) * chatter
    gearbox = from_db(gearbox_db + 6.5) * resonate(gearbox_grit, GEARBOX)
    hiss = from_db(hiss_db + 7.5) * colour(grains(11000, 1.7, count=1)[0] * chatter, HISS_SPECTRUM)
    return press * notched(wall + hollow + bore + gearbox + hiss)


def scene():
    """Drill and hone, the room, air on the microphone and the floor."""
    (depth,), (fan_db,), (slack, gear_slack) = in_time(DEPTH), in_time(FAN), slackening()
    trigger = 1 - np.exp(-np.maximum(TIME - SQUEEZE_S, 0) / SPIN_UP_S)
    stumble_s, half_s, turns_lost, gear_lost_db, fan_lost_db = STUMBLE
    stumble = hump(stumble_s, half_s)
    speed = motor_speed(trigger) - turns_lost * stumble
    angle = 2 * np.pi * np.cumsum(speed * (1 + .0006 * drift(14))) / SR
    running = from_db(-900 * np.clip(TIME - STOP_S, 0, .2))  # a very steep fade once the chuck stops

    scrape_db, bore_db, gearbox_db, hiss_db = (
        law_level(law, depth, speed, slack) for law in (SCRAPE_LAW, BORE_LAW, GEARBOX_LAW, HISS_LAW))
    brake_fade_db = BRAKE_FADE_DB_PER_S * np.maximum(TIME - BRAKE_S, 0)
    gear_db = gear_level(trigger, depth, gear_slack) - gear_lost_db * stumble - brake_fade_db
    hum_db = np.interp(speed, *np.transpose(HUM)) + HUM_SLACK_DB * slack
    fan_db = fan_db - fan_lost_db * stumble

    gear = running * gear_whine(angle, speed, gear_db)
    tones = running * fan_and_motor(angle, speed, trigger, fan_db, hum_db, bore_db, hiss_db)
    rubbing = running * honing(angle, speed, depth, scrape_db, bore_db, gearbox_db, hiss_db)
    contacts = rubbing + clacks() + wires()
    bay = from_db(BAY_DB) * engine_bay(contacts, depth)
    workshop = from_db(WORKSHOP_DB) * reflections(contacts + tones + gear[0], WORKSHOP_T60_S)
    near = gear + ports(tones + contacts + bumps())
    return near + bay + workshop + buffeting(depth, running) + workshop_floor()


def record(dry):
    """The top of the treble is cut steeply."""
    return signal.sosfilt(signal.ellip(12, .1, 90, CUTOFF_HZ, fs=SR, output="sos"), dry)


dry = scene()
out = record(dry)
master_out(out)
```